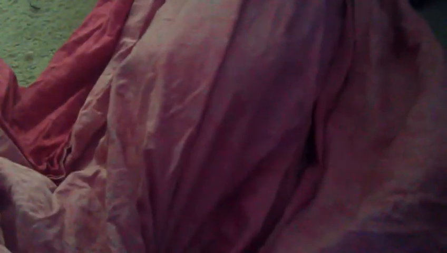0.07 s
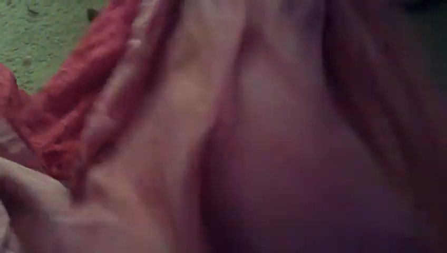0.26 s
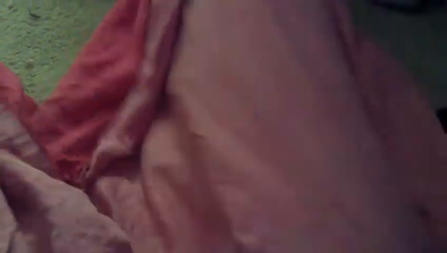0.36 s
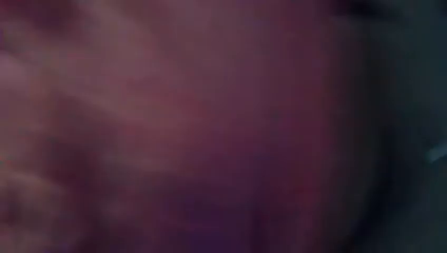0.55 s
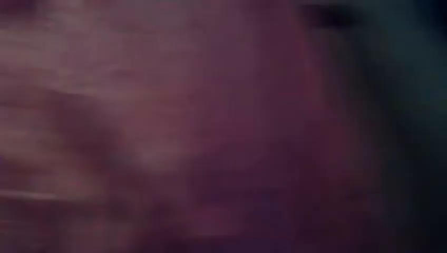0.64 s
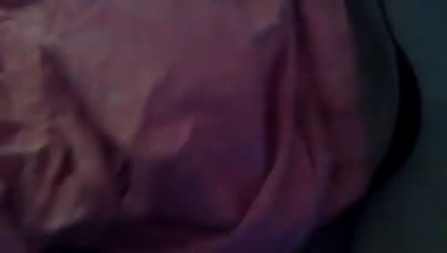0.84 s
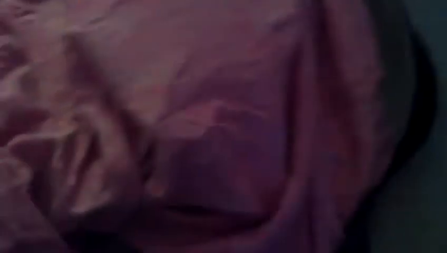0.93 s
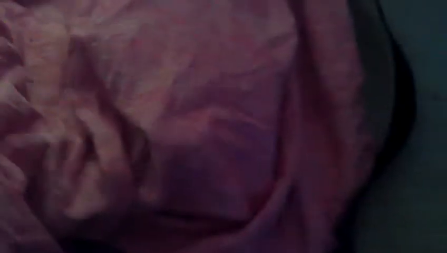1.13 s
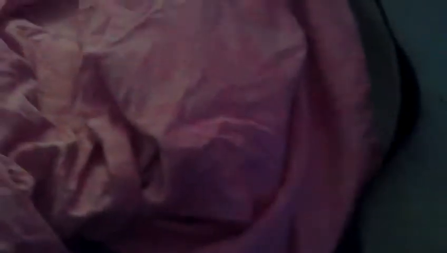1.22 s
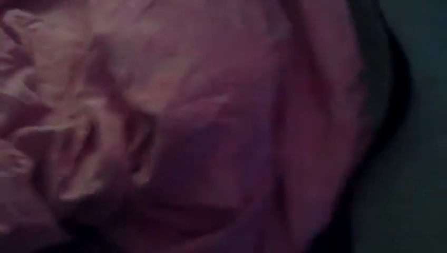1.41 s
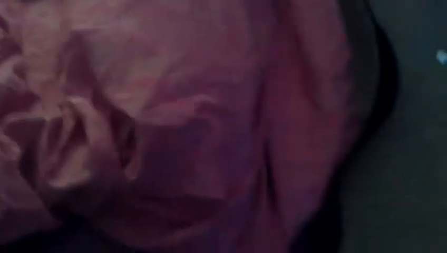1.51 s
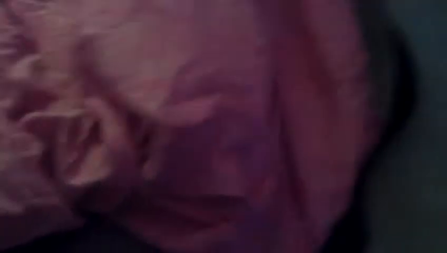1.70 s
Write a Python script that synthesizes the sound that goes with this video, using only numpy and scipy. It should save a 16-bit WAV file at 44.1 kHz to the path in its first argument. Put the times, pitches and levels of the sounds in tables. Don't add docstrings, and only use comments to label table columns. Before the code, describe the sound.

Stiff fabric crumpled close to the microphone, with sharp crackles, soft fold thuds and tiny metallic clinks

```python
import sys
import numpy as np
from scipy import signal
from scipy.io import wavfile

SR = 44100
rng = np.random.default_rng(int(sys.argv[2]) if len(sys.argv) > 2 else 0)


def store_wav(level_fs):
    pcm = np.round(np.clip(np.atleast_2d(level_fs), -1, 1) * 32767)
    wavfile.write(sys.argv[1], SR, pcm.T.astype(np.int16))


def amplitude_ratio(level_db):
    exponent = np.asarray(level_db, float) / 20
    return 10 ** exponent


N = 77175
FLOOR_DB, FLOOR_TILT_DB = -63.5, 0.93
CHATTER_S = 0.0012


def rms_one(x):
    return x / np.sqrt(np.mean(x ** 2) + 1e-20)


def at_hz(points, hz):
    table_hz, value = np.array(points).T
    return np.interp(np.log(hz), np.log(table_hz), value)


def drift(rate_hz):
    hop = 40
    r = np.exp(-2 * np.pi * rate_hz * hop / SR)
    noise = rng.standard_normal(N // hop + 2002)
    slow = signal.lfilter([1], [1, -2 * r, r * r], noise)[2000:]
    return np.interp(np.arange(N) / hop, np.arange(len(slow)), rms_one(slow))


def ring(clicks, hz, t60_s):
    r = amplitude_ratio(-60 / (t60_s * SR))
    w = 2 * np.pi * hz / SR
    return signal.lfilter([0, np.sin(w)], [1, -2 * r * np.cos(w), r * r], clicks + 1e-18)


def bandpass(x, low_hz, high_hz):
    return signal.sosfilt(signal.butter(2, [low_hz, high_hz], "band", fs=SR, output="sos"), x)


def add(out, piece, start_s, pan_db):
    i = int(start_s * SR)
    sides = amplitude_ratio(np.array([[pan_db / 2], [-pan_db / 2]]))
    out[:, i:i + piece.shape[1]] += piece[:, :N - i] * sides


# start_s [s], rise_s [s], peak_db [dB], t60_s [s], tilt_db [dB per octave]
HANDFULS = [(0.181, 0.029, -47.5, 0.92, 3), (0.258, 0.044, -44.5, 0.33, 3), (0.358, 0.013, -52, 0.53, -0.1),
            (0.606, 0.085, -53, 0.93, 2), (0.826, 0.007, -48.5, 0.58, 1.5), (.885, 0.018, -68, 0.98, 18),
            (0.928, 0.0077, -50.5, 0.31, 2.5), (1.187, 0.047, -55, 2.28, 2.5), (1.28, 0.028, -70, 0.64, 10),
            (1.45, 0.012, -62, 1.3, -1.4), (1.57, 0.022, -61, 4.5, 0.2), (.595, 0.049, -64.5, 0.4, 12.5),
            (.262, 0.015, -50.5, 0.26, 8.5), (.309, 0.0087, -52, 0.13, 6), (.848, .008, -56, .12, 10),
            (1.195, 0.013, -66, 0.45, 12.5), (.864, .006, -50.5, 0.16, 3.5), (1.72, 0.031, -65.5, 1.7, 14)]


def handling():
    t = np.arange(N) / SR
    power = amplitude_ratio(2 * FLOOR_DB) * np.ones(N)
    weighted_tilt = power * FLOOR_TILT_DB
    for start_s, rise_s, peak_db, t60_s, tilt_db in HANDFULS:
        decay = amplitude_ratio(peak_db - 60 * np.clip(t - start_s - rise_s, 0, 9) / t60_s)
        grip = (decay * np.clip((t - start_s) / rise_s, 0, 1)) ** 2
        power = power + grip
        weighted_tilt = weighted_tilt + grip * tilt_db
    return 10 * np.log10(power), weighted_tilt / power


# frequency_hz [Hz], density_db [dB per Hz]
CLOTH_SPECTRUM = [(35, -60), (60, -25.5), (225, 1.5), (826, -4), (1110, -5.5), (2890, -11.5), (7040, -27),
                  (9470, -25.5), (14000, -60.5)]
# frequency_hz [Hz], likeness [0 to 1]
CLOTH_LIKENESS = [(100, 0.94), (300, 1), (600, 0.78), (1200, 0.49), (3000, 0.098), (10000, 0.23)]
GRAINS_PER_S, GRAIN_DB, GRAIN_SPREAD_DB, GRAIN_CYCLES = 1500, -7, 3.0, 4.0


def rustle(level_db, tilt_db, patchy_db):
    out = 0
    together = drift(25)
    edges = 60 * 2 ** np.arange(0, 8, 0.4)
    white = rng.standard_normal((2, 2, N))
    sizes = amplitude_ratio(GRAIN_SPREAD_DB * np.minimum(rng.exponential(1, N), 2.5)) * rng.choice([-1, 1], N)
    born = sizes * (rng.random(N) < GRAINS_PER_S * amplitude_ratio(3 * drift(15)) / SR)
    dealt, lean = rng.integers(0, len(edges) - 1, N), rng.uniform(-0.86, 1, N)
    opposed = np.array([[1], [-1]])
    for k, (low, high) in enumerate(zip(edges, edges[1:])):
        mid, side = bandpass(white[k % 2], low, high)
        hz = np.sqrt(low * high)
        alike = np.clip(at_hz(CLOTH_LIKENESS, hz), 0, 1)
        hiss = np.sqrt(1 + alike) * mid + np.sqrt(1 - alike) * side * opposed

        ticks = born * (dealt == k) * (1 + 0.85 * lean * opposed)
        creases = rms_one(ring(ticks, hz, GRAIN_CYCLES / hz))
        grains = amplitude_ratio(GRAIN_DB) * min(1, hz / 400) * np.std(mid) * creases

        patches_db = patchy_db * (0.3 * together + drift(11.0))
        gain_db = at_hz(CLOTH_SPECTRUM, hz) + tilt_db * np.log2(hz / 1000) + patches_db
        out = out + amplitude_ratio(gain_db) * (hiss + grains)
    return amplitude_ratio(level_db - 29) * out * amplitude_ratio(0.7 * opposed)


WHINE_HZ, WHINE_DB, WHINE_FOLLOWS, WHINE_WANDER_DB = 820.7, -71.5, 1, 0.5


def whine(level_db):
    follow_db = WHINE_FOLLOWS * np.clip(level_db - FLOOR_DB, 0, 6)
    db = WHINE_DB + follow_db + WHINE_WANDER_DB * drift(3.9)
    phase = 2 * np.pi * WHINE_HZ * np.arange(N) / SR + 0.67 * drift(21)
    return amplitude_ratio(db) * np.sqrt(2) * np.sin(phase + np.array([[0], [0.3]]))


# start_s [s], peak_db [dB], pitch_hz [Hz], t60_s [s], pan_db [left-right dB]
THUDS = [
    (0.2097, -36, 328, 0.1, 1),
    (.2126, -32, 670, 0.15, 1),
    (0.29, -74, 60, 0.13, 5),
    (0.3072, -33.5, 380, .05, 1.5),
    (0.328, -45, 386, 0.028, 8),
    (0.3403, -34, 890, 0.0082, 0),
    (0.352, -40, 820, 0.036, -5),
    (.379, -38.5, 740, 0.0084, 1.5),
    (0.767, -47.5, 353, 0.018, 3),
    (0.855, -61, 60, 0.083, -6),
]
SNAPS = [(0.225, -48, 4860, 0.017, 2), (0.2762, -37, 2650, 0.034, 6), (0.3009, -25, 2940, 0.013, 0),
         (0.3043, -24, 3880, 0.017, 6), (0.653, -39, 1880, 0.017, -3), (.6815, -56, 750, 0.014, 3),
         (.825, -35, 2360, 0.057, 3), (0.8344, -25.5, 2090, 0.027, -0.5), (.8362, -31, 744, 0.037, 2.5),
         (0.854, -49, 1970, .03, 4), (0.86, -25.5, 1900, 0.036, 3), (0.874, -50, 2270, 0.041, 0),
         (.925, -42.5, 7700, 0.028, -9), (0.9449, -39, 8360, .02, -1), (.946, -46, 785, 0.037, 4),
         (1.073, -50.5, 9300, .02, -2), (1.199, -45.5, 1540, 0.045, -6), (1.225, -47, 5870, .015, -1),
         (1.473, -43, 4300, 0.052, 2), (1.5275, -45.5, 620, 0.043, 1.5), (1.5382, -53, 7400, 0.015, -2),
         (1.589, -44, 2100, 0.017, 5), (1.617, -45, 2530, 0.034, 1)]
CRACKS = [(0.2889, -17.5, 11600, 0.071, 0.5), (0.2894, -29, 4800, 0.017, 11),
          (.3044, -17.5, 10900, 0.021, -4), (0.312, -28.5, 6530, 0.1, -3), (0.655, -55, 9800, 0.024, -13),
          (0.691, -41.5, 9000, 0.016, -5), (0.825, -52, 9000, .012, 0), (0.8345, -31.5, 4040, 0.014, 5.5),
          (0.835, -40, 6200, 0.012, 1), (0.835, -55, 11000, 0.0099, -2), (.8545, -47, 8900, 0.027, -2),
          (.8545, -48, 4200, .03, 0), (0.925, -46, 4600, .012, 9), (.9248, -41, 11500, .012, 0),
          (0.8605, -45, 8500, 0.013, -3), (.8745, -51, 9300, .02, -2), (0.895, -50, 9100, .04, -7),
          (0.9442, -34.5, 6300, 0.065, 1.5), (.9447, -38.5, 10900, .018, -1), (1.195, -48.5, 5230, .04, 5),
          (1.289, -40.5, 4450, 0.066, -2), (.3185, -43, 11000, .03, 0), (0.684, -41.5, 1500, 0.016, -3),
          (1.223, -49, 9800, 0.017, -2), (1.2356, -34.5, 4630, 0.016, 5), (1.2358, -28, 9800, 0.017, -3),
          (1.2744, -48, 10000, .02, -6), (1.326, -49, 2980, 0.0089, 3)]
SNAP_WIDTH, SNAP_CRUMBLE_S = 0.54, 0.0011
LAG_SPREAD_S = 0.00008


def snaps():
    out, t = np.zeros((2, N)), np.arange(SR // 8) / SR
    for start_s, peak_db, pitch_hz, t60_s, pan_db in SNAPS + THUDS + CRACKS:
        decay = np.exp(-t / SNAP_CRUMBLE_S) + 0.5 * amplitude_ratio(-60 * t / t60_s)
        burst = rng.standard_normal(len(t)) * decay * np.clip(t / 0.00025, 0, 1)
        burst[8] += 1.5
        low, high = pitch_hz * (1 + SNAP_WIDTH / 2) ** np.array([-1, 1])
        body = bandpass(burst, low, high)
        onset = burst * np.exp(-t * pitch_hz / 8)
        body = body + 0.3 * bandpass(onset, pitch_hz / 2, min(2 * pitch_hz, 16000))
        lag = min(abs(LAG_SPREAD_S * SR * rng.standard_normal()), SR / pitch_hz / 4)
        late = np.roll(body, round(lag))
        pair = np.array([body, late])[::rng.choice([-1, 1])]
        add(out, amplitude_ratio(peak_db) * pair / np.abs(body).max(), start_s, pan_db)
    return out


# start_s [s], loop_db [dB], tab_db [dB], slider_db [dB], teeth_db [dB]
JINGLES = [
    (0.2899, -35, -28, -29, -49),
    (0.3031, -42, -33.5, -48, -41),
    (0.6723, -47, -66, -49, -50),
    (0.6897, -46.5, -43, -60, -42.5),
    (1.2352, -43, -33, -55, -31.5),
    (1.244, -56, -63, -56, -51),
    (1.254, -60, -66, -51, -58),
    (1.276, -56, -60, -59, -54),
    (1.2907, -51, -62, -37.5, -42),
    (1.298, -51, -47.5, -41.5, -39.5),
]
# pitch_hz [Hz], level_db [dB], t60_s [s]
LOOP = [(4030, 7, 0.029), (7400, 3.5, 0.06), (5300, -1, 0.014)]
TAB = [(6410, 0.41, 0.05)]
SLIDER = [(9000, -4, 0.043), (8600, -14, 0.03), (7860, -17.5, 0.048)]
TEETH = [(4460, -4.5, 0.072), (9810, -13, 0.021), (10300, -18, .04), (11600, -19, 0.012),
         (11370, -11, 0.021), (12050, -11, 0.055), (13560, -6.5, 0.069)]
STRIKE_SCATTER_DB, MODE_PAN_DB = 1.5, 2.5
CATCH_T60_S = 0.012


def jingles():
    out, t = np.zeros((2, N)), np.arange(SR // 5) / SR
    for (start_s, *parts_db), (next_s, *_) in zip(JINGLES, JINGLES[1:] + [(N / SR,)]):
        caught = amplitude_ratio(-60 * np.clip(t - (next_s - start_s), 0, 1) / CATCH_T60_S)
        for part_db, modes in zip(parts_db, (LOOP, TAB, SLIDER, TEETH)):
            for pitch_hz, level_db, t60_s in modes:
                scatter, pan, turn = rng.standard_normal(3)
                tremble_db = 3.5 * np.sin(rng.uniform(300, 1200) * t)
                swell = (1 - np.exp(-t / CHATTER_S)) * amplitude_ratio(-60 * t / t60_s + tremble_db)
                phase = np.tanh(turn) * np.array([[0.9], [-0.9]]) + rng.uniform(0, 8.4)
                tone = caught * swell * np.sin(2 * np.pi * pitch_hz * t + phase)
                strike_db = part_db + level_db + STRIKE_SCATTER_DB * scatter
                add(out, amplitude_ratio(strike_db) * tone, start_s, MODE_PAN_DB * np.tanh(pan) + 1.5)
    return out


# start_s [s], level_db [dB], pitch_hz [Hz], t60_s [s], pan_db [left-right dB]
PINGS = [(.296, -31, 13000, 0.087, 3), (0.29, -32, 9830, 0.027, 0), (0.3052, -25, 11050, 0.022, -2),
         (0.3048, -31.5, 3870, 0.022, 3), (.325, -60, 10000, 0.13, -7), (.6755, -49, 6320, .1, 3),
         (0.689, -47, 4330, .025, 8), (1.2902, -45.5, 4150, 0.062, -1), (1.306, -47, 4460, 0.093, -1),
         (.839, -31, 2270, 0.017, -3), (0.874, -44.5, 4010, 0.055, -3), (0.949, -53, 3900, 0.076, 0),
         (1.2357, -30, 11020, 0.012, 4), (1.275, -45.5, 10100, .05, -3), (1.305, -57, 10850, 0.061, 0)]


def pings():
    out, t = np.zeros((2, N)), np.arange(SR // 5) / SR
    chances = rng.uniform(-1.4, 1, (len(PINGS), 2))
    for (start_s, level_db, pitch_hz, t60_s, pan_db), (tremble, turn) in zip(PINGS, chances):
        tremble_db = 3.5 * np.sin((700 + 400 * tremble) * t)
        swell = (1 - np.exp(-t / CHATTER_S)) * amplitude_ratio(-60 * t / t60_s + tremble_db)
        phase = turn * np.array([[0.7], [-0.7]])
        tone = swell * np.sin(2 * np.pi * pitch_hz * t + phase)
        add(out, amplitude_ratio(level_db) * tone, start_s, pan_db)
    return out


ROOM_DB, ROOM_T60_S = -15, 0.1


def room(x):
    t = np.arange(SR // 3) / SR
    tail = rng.standard_normal((2, len(t))) * amplitude_ratio(-60 * t / ROOM_T60_S) * np.clip(t / 0.0088, 0, 1)
    tail = signal.lfilter([1], [1, -0.4], tail)
    tail = tail / np.sqrt(np.sum(tail ** 2, axis=1, keepdims=True))
    return signal.fftconvolve(x, tail, axes=1)[:, :N]


def scene():
    level_db, tilt_db = handling()
    hits = snaps() + jingles() + pings()
    cloth = rustle(level_db + 41.5, tilt_db, patchy_db=1.5)
    return hits + amplitude_ratio(ROOM_DB) * room(hits) + cloth + whine(level_db)


def band_limit(x):
    return signal.sosfilt(signal.butter(12, 14100, fs=SR, output="sos"), x)


def record(dry):
    for order, hz, kind in ((2, 117, "high"), (6, 11600, "low")):
        dry = signal.sosfilt(signal.butter(order, hz, kind, fs=SR, output="sos"), dry)
    for hz, db in ((9800, 6.5), (7470, -4.5)):
        dry = dry + (amplitude_ratio(db) - 1) * signal.lfilter(*signal.iirpeak(hz, 4.0, fs=SR), dry)
    mix = signal.sosfilt(signal.cheby2(12, 60, 14800, fs=SR, output="sos"), dry)
    return band_limit(mix)


dry = scene()
out = record(dry)
store_wav(out)
```